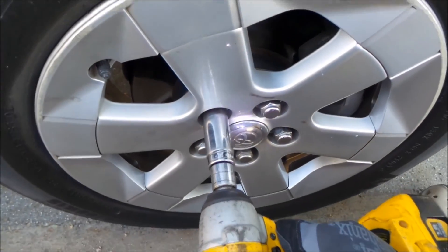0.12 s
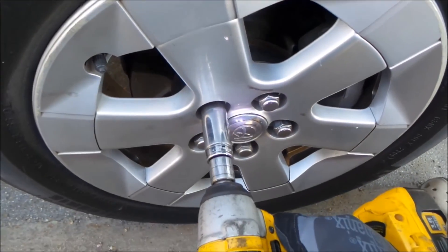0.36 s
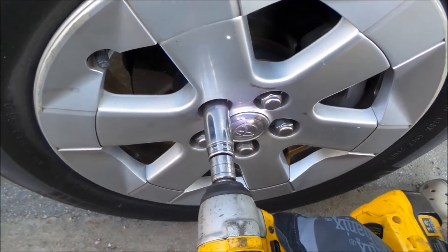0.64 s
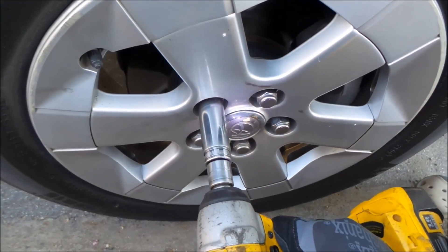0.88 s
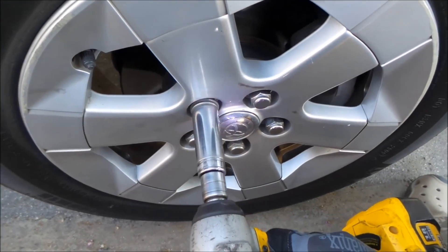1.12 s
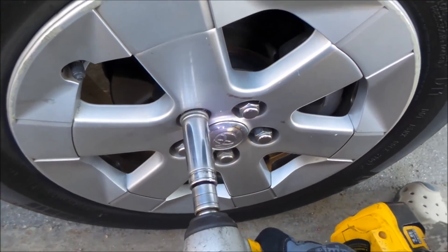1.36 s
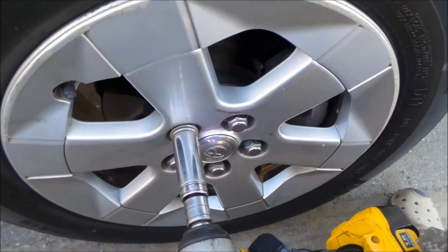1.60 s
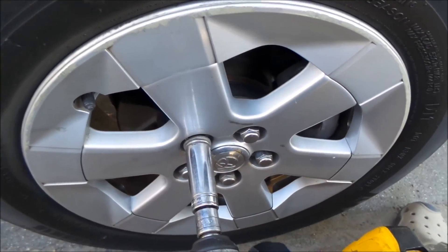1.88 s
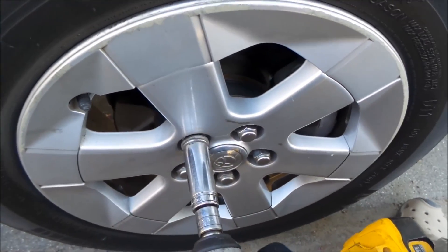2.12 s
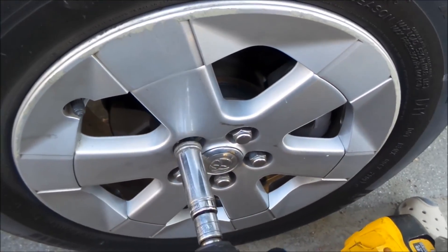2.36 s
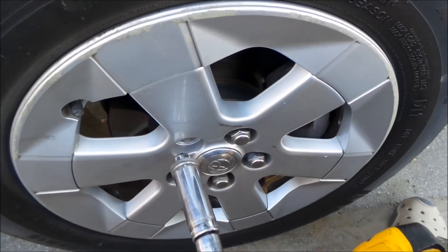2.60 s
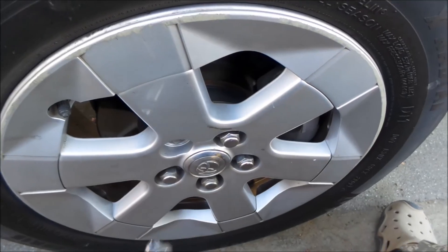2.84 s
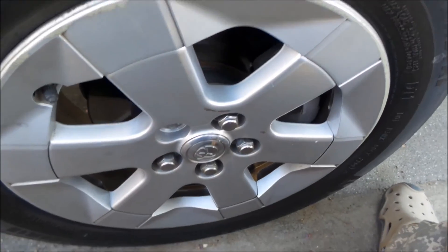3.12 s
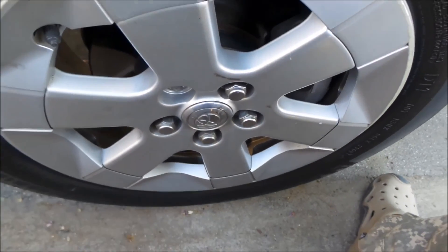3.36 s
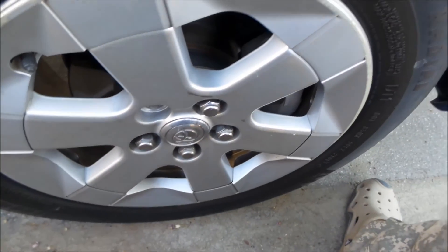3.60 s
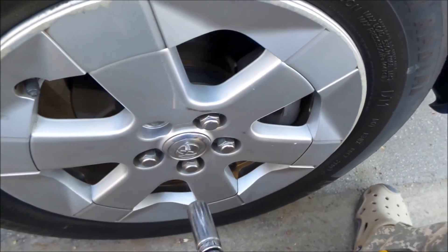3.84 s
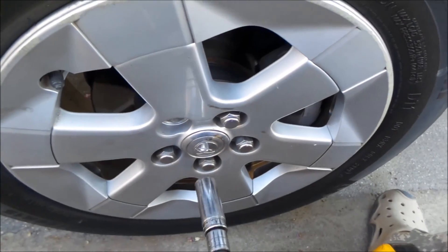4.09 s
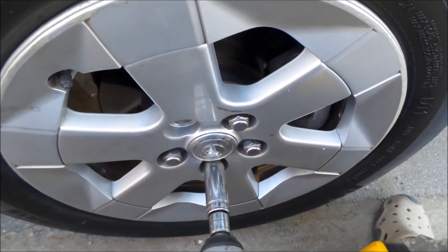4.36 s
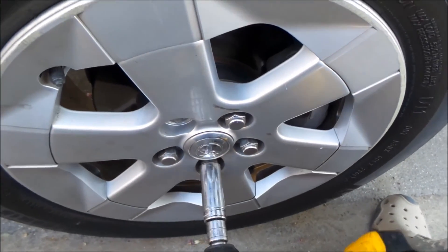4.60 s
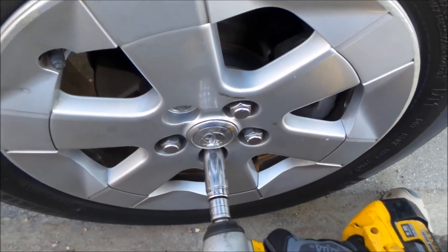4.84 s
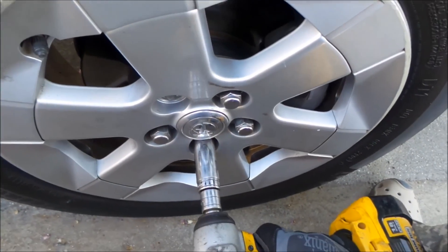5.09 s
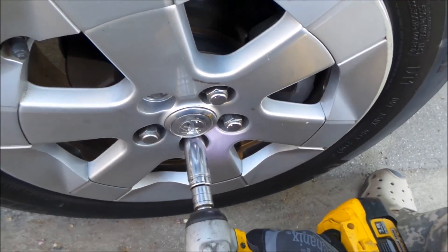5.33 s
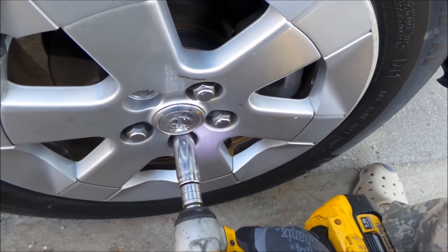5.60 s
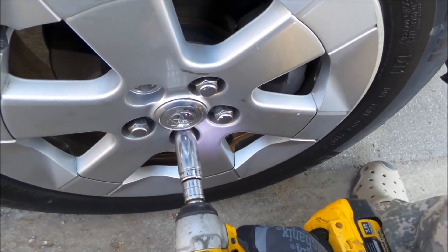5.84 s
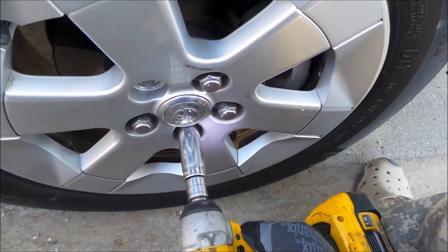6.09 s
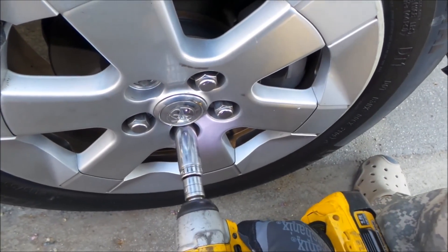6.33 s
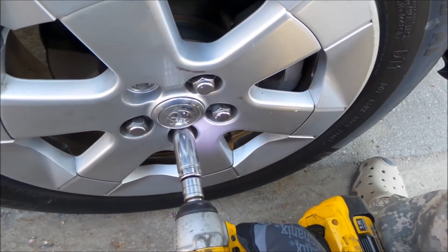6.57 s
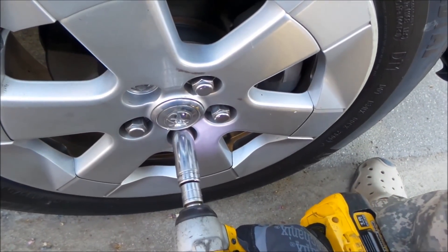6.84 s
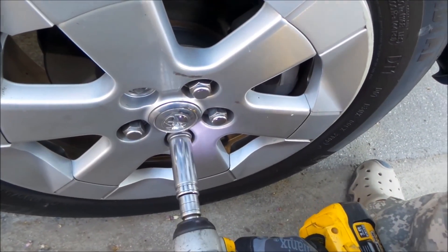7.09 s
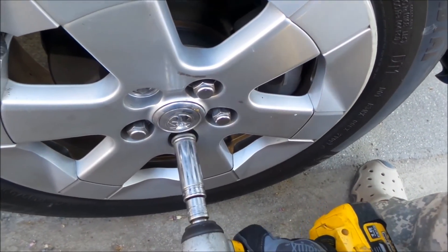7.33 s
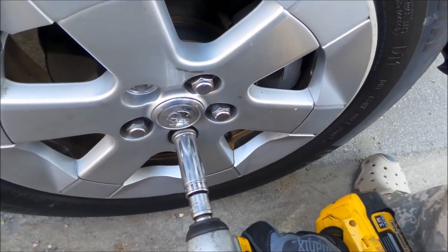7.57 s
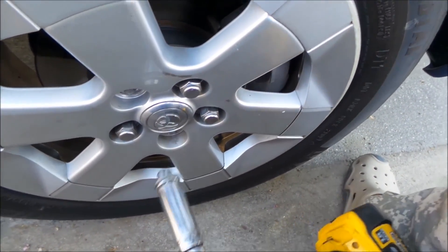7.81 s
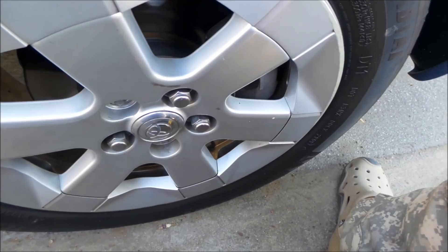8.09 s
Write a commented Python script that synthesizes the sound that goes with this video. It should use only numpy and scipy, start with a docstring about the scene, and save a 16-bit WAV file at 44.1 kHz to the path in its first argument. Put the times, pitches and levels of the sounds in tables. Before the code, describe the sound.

A cordless impact wrench hammers a wheel nut in a harsh rapid rattle, spins free, then the socket clinks onto another nut and hammers again.

```python
"""A cordless impact wrench pounds on a wheel nut about 47 times a second over a distant traffic rumble.
The nut lets go, the motor spins free, coasts and stops, and the loose steel socket rattles and chatters.
After a pause the socket clinks and knocks its way onto a second nut; the wrench pounds and spins again.
The last clinks fade into the street. Blows and motor are shaped noise, ringing modes and gear tones,
socket contacts are noise bursts with decaying sines, and the microphone input overloads on the blows."""
import sys
import numpy as np
from scipy import signal
from scipy.fft import rfft, irfft, next_fast_len
from scipy.io import wavfile
from scipy.ndimage import uniform_filter1d

SR = 44100
rng = np.random.default_rng(int(sys.argv[2]) if len(sys.argv) > 2 else 0)


def bounce(signal):
    """Save signal as a 16-bit WAV file at the path given by the first command-line argument."""
    frames = np.transpose(np.atleast_2d(signal))
    limited = np.clip(frames, -1, 1)
    pcm = np.round(limited * 32767).astype(np.int16)
    wavfile.write(sys.argv[1], SR, pcm)


def voltage_ratio(level):
    """Linear amplitude factor for a level in decibels (scalar or array-like)."""
    return 10 ** (np.asarray(level, float) / 20)


N = 361619

# trigger pulls: pulled_s, nut_free_s, released_s, brake_s, free_mesh_hz (gear mesh pitch once the nut is free)
PULLS = [(-.3, .885, 1.375, 1.845, 1760), (5.214, 6.875, 7.245, 7.37, 1790)]
# hammering, one row a pull: steady_beat_start_s, gap_after_first_blow_s
BURSTS = [(.0108, .021), (5.2918, .031)]


def in_time(rows):
    """Columns of a curve table, one value per sample."""
    s, *columns = np.transpose(rows)
    return [np.interp(np.arange(N) / SR, s, column) for column in columns]


def coloured(x, spectrum):
    """Give white noise a spectrum (Hz, dB); rms 1."""
    hz, db = np.transpose(spectrum)
    size = next_fast_len(N)
    grid = np.maximum(np.arange(size // 2 + 1) * SR / size, 1)
    gain = voltage_ratio(np.interp(np.log(grid), np.log(hz), db))
    y = irfft(rfft(x, size) * gain, size)[:N]
    return y / y.std()


def drift(rate):
    """Slow chance with spread 1, rate knots per second."""
    knots = rng.standard_normal(int(N / SR * rate) + 2)
    return np.interp(np.arange(N) / SR * rate, np.arange(len(knots)), knots) * np.sqrt(3 / 2)


def resonate(x, hz, width):
    """Two-pole resonance, width in Hz; white noise keeps its rms."""
    r = np.exp(-np.pi * width / SR)
    gain = np.sqrt((1 - r * r) / 2)
    return signal.lfilter([gain, 0, -gain], [1, -2 * r * np.cos(2 * np.pi * hz / SR), r * r], x + 1e-18)


def grit(spread_db):
    """Dense clicks of very uneven size."""
    return rng.standard_normal(N) * voltage_ratio(spread_db * rng.standard_normal(N))


def street():
    """Lumpy distant rumble, a smooth hiss whose level follows the same curve and two faint whistles."""
    # background level, sinks after loud sounds and comes back, as with automatic gain: time_s, relative level_db
    background_level = [(.95, -48), (1.35, -52), (1.9, -56), (2.45, -52), (2.85, -43), (3.4, -40),
                        (3.55, -45), (4.0, -49.5), (4.4, -49.5), (4.7, -39.5), (5.18, -37.5), (6.95, -52.5),
                        (7.3, -54.5), (7.6, -55.5), (8.2, -50)]
    # colour of the rumble: pitch_hz, relative level_db (per Hz)
    rumble_colour = [(15, -48), (25, -28), (75, -0.5), (130, 0.5), (242, -6), (284, -10.5), (319, -10.5),
                     (482, -13.5), (1150, -17.5), (2750, -33.5), (6000, -39), (7800, -68), (13200, -120)]
    # colour of the hiss: pitch_hz, relative level_db (per Hz)
    hiss_colour = [(880, -30.5), (1500, 2), (1920, -8.5), (3480, -13.5), (8930, -11), (11600, -11.5),
                   (13600, -9.5), (15600, -23.5)]
    # thin whistles arching in pitch and level: start_s, end_s, pitch_hz, rise_hz, top level_db
    whistle_rows = [(2.75, 2.91, 10300, 1600, -62), (7.15, 7.8, 14400, 10, -67)]
    # hiss at a background level of -41.5 dB; share of that level's changes in dB; floor
    hiss_db, hiss_follows, hiss_least_db = -56.5, 1.5, -73.5
    whistle_edge_db = 18.5   # start and end of a whistle below its top

    background_db, = in_time(background_level)
    rumble_gain = voltage_ratio(background_db + 1.0 + 0.93 * drift(7.4))
    out = rumble_gain * coloured(rng.standard_normal(N), rumble_colour)
    level_db = np.maximum(hiss_db + hiss_follows * (background_db + 41.5), hiss_least_db)
    out += voltage_ratio(level_db + .8 * drift(23)) * coloured(rng.standard_normal(N), hiss_colour)
    t = np.arange(N) / SR
    for start, end, hz, rise_hz, db in whistle_rows:
        arch = 1 - np.abs(2 * (t - start) / (end - start) - 1)
        on = arch > 0
        level_db = db - whistle_edge_db * (1 - arch * on) ** 2 + 3.5 * drift(90)
        pitch_hz = hz + rise_hz * arch * on + 90 * drift(300)
        out += on * voltage_ratio(level_db) * np.sin(2 * np.pi * np.cumsum(pitch_hz) / SR)
    return out


def surroundings(x):
    """Car body, ground and walls scatter back a short dull tail."""
    age = np.arange(SR // 2) / SR
    tail = rng.standard_normal(len(age)) * voltage_ratio(-60 * age / .22) * (age > .004)
    tail = signal.lfilter([.5], [1, -.4], tail)
    return signal.fftconvolve(x, tail / np.sqrt(np.sum(tail ** 2)))[:N]


def motor_state():
    """Mesh pitch, whirr dB and whine dB: run up under load, spin free, coast, then a fast fade at the brake."""
    # motor noise at the loaded speed: relative level_db, one for each pull
    whirr_pull_db = [-28.5, -30.5]
    # gear tones at the loaded speed: relative level_db, one for each pull
    whine_pull_db = [-46.5, -41.5]
    start_hz, loaded_hz, run_up_s, spin_free_s = 350, 1515, .025, 0.12   # gear mesh pitch; time constants
    coast_hz_per_s, brake_db_per_s = 1650, 499.5
    whirr_loaded_db, whirr_follows = 3.5, 1   # extra while hammering; share of the speed change in dB
    whine_loaded_db, whine_coast_db, whine_follows = -7.0, -5, .4

    t = np.arange(N) / SR
    pull_now = np.searchsorted([p[0] for p in PULLS], t) - 1
    pulled, free, released, brake, free_hz = np.transpose(PULLS)[:, pull_now]
    mesh_hz = loaded_hz - (loaded_hz - start_hz) * np.exp(-(t - pulled) / run_up_s)
    free_s = np.clip(t - free, 0, released - free)
    mesh_hz += (free_hz - loaded_hz) * (1 - np.exp(-free_s / spin_free_s))
    mesh_hz = np.maximum(mesh_hz - coast_hz_per_s * np.maximum(t - released, 0), start_hz)
    speed_db = 20 * np.log10(mesh_hz / loaded_hz)
    stop_db = brake_db_per_s * np.maximum(t - brake, 0)
    hammering = np.any([(t > start - gap) & (t < pull[1])
                        for (start, gap), pull in zip(BURSTS, PULLS)], axis=0)
    loaded, coasting = (uniform_filter1d(1. * on, size=SR // 50) for on in (hammering, t > released))
    whirr_db = np.array(whirr_pull_db)[pull_now] + whirr_loaded_db * loaded
    whirr_db += whirr_follows * speed_db - stop_db
    whine_db = np.array(whine_pull_db)[pull_now] + whine_loaded_db * loaded + whine_coast_db * coasting
    whine_db += whine_follows * speed_db - 2.03 * stop_db
    return mesh_hz, np.maximum(whirr_db, -150), np.maximum(whine_db, -150)


def motor():
    """Brush and gear noise, uneven with each turn, under slightly wavering tones; it sets the rim humming."""
    # tones of motor and gears: multiple of the mesh pitch (the first is the motor's turn), relative level_db
    gear_tones = [(.14, -13), (1.0, -2.5), (1.12, -8.5), (1.84, -12.5), (1.944, -1.5), (2.71, -5),
                  (3.0, -9), (3.33, -5.5), (3.75, -4), (4.44, -7)]
    # slow rings of the rim: pitch_hz, width_hz, level_db against the whirr
    rim_modes = [(686, 1.6, -30.5), (5070, 2.7, -29.5), (636, 70, -18)]
    # colour of the motor noise: pitch_hz, relative level_db (per Hz)
    whirr_colour = [(60, -47.5), (150, -26), (400, -17.5), (670, -18), (1140, -12.5), (2000, -7),
                    (3340, -4), (4500, -9), (8000, -8), (12100, -7.5), (15600, -12.5)]

    mesh_hz, whirr_db, whine_db = motor_state()
    turn = 2 * np.pi * np.cumsum(mesh_hz * (1 + .004 * drift(120))) / SR
    tones = sum(voltage_ratio(db + 2.4 * drift(25)) * np.sin(order * turn) for order, db in gear_tones)
    whirr = coloured(grit(3.8), whirr_colour) * voltage_ratio(whirr_db + 1.5 * drift(60))
    whirr *= 1 + 0.18 * np.sin(gear_tones[0][0] * turn)
    shake = rng.standard_normal(N) * voltage_ratio(whirr_db)
    hum = sum(voltage_ratio(db) * resonate(shake, hz, width) for hz, width, db in rim_modes)
    return whirr + hum + voltage_ratio(whine_db + 5.5) * tones


def contacts():
    """All contacts in time order: (s, crack, ring, clank, knock, upper and lower knock modes dB)."""
    # the socket rattles on the tool: time_s, relative ring_db, clank_db
    tool_rattles = [(0.961, -27, -43), (0.9933, -24.5, -33.5), (1.029, -24.5, -36.5), (1.0597, -24, -31.5),
                    (1.3045, -15.5, -26.5), (1.3437, -20, -42.5), (1.3692, -18, -23.5), (1.401, -19, -27),
                    (1.434, -19.5, -24), (1.4629, -21.5, -21), (1.4964, -26.5, -23.5),
                    (1.5058, -18.5, -41.5), (1.5349, -19, -26), (1.5718, -17.5, -42), (1.581, -29, -23.5),
                    (1.6553, -22, -31), (1.6817, -18.5, -28), (1.706, -21.5, -35.5), (1.7604, -18, -31),
                    (1.7954, -34.5, -28.5), (1.8358, -25.5, -22.5), (2.509, -66.5, -61.5),
                    (7.3288, -20.5, -26.5), (7.3365, -16.5, -35), (7.3497, -16, -18)]
    # single broad clinks and clunks, among them the click of the trigger:
    # time_s, relative ring_db, crack_db, body_db
    single_clinks = [(0.917, -27.5, -27, -31), (1.779, -40, -41.5, -30), (1.9476, -60, -57, -52),
                     (2.555, -52, -70, -75), (3.2818, -51.5, -48.5, -54), (3.3191, -53.5, -51.5, -60),
                     (3.341, -38, -36, -40), (3.4765, -1.5, -34.5, -27), (3.4895, -18, -42, -43),
                     (3.5595, -16, -37, -43.5), (3.586, -23.5, -48, -53), (3.617, -30.5, -56, -51),
                     (3.6298, -22.5, -37, -39.5), (3.663, -26, -42.5, -51), (3.684, -33, -40, -46),
                     (3.695, -36, -51.5, -57), (3.7065, -44, -52, -55), (3.734, -34.5, -45.5, -53),
                     (3.7467, -38.5, -47, -57), (3.782, -66.5, -66, -65.5), (5.2038, -35.5, -28.5, -24.5),
                     (6.9023, -33, -30, -34.5), (7.291, -19.5, -24.5, -27.5), (7.45, -58.5, -57, -52.5),
                     (7.5484, -75, -68, -60.5), (7.625, -76, -68, -68), (7.685, -62.5, -74, -66),
                     (7.849, -42, -62, -66), (7.8708, -50, -61, -64), (7.932, -44, -76, -79),
                     (7.975, -75.5, -80, -80), (8.16, -80, -76, -63)]
    # the socket is pushed onto the nut: time_s, relative knock_db, ring_db, upper knock modes_db
    nut_knocks = [(2.5392, -52, -71, -7), (4.3611, -52, -68, -5), (4.436, -27, -38, -0.5),
                  (4.4665, -26.5, -20.5, -2.5), (4.4785, -28, -43.5, 6), (4.494, -43, -57, 5.5),
                  (4.605, -43.5, -63, -12), (4.8459, -33, -43, -15), (4.8653, -35.5, -60.5, -13),
                  (4.882, -32, -59, -16), (4.898, -44, -45.5, -8), (4.9294, -30, -61, -14),
                  (4.9527, -29, -51.5, -15), (4.966, -36, -57, -1), (4.985, -43.5, -60, 3)]
    rattle_crack_db, rattle_knock_db = -13.5, -17.5   # against the ring
    clink_knock_db, clink_modes_db = 1, -8.0   # knock against the body; knock modes against the knock
    knock_crack_db, knock_clank_db, knock_low_db = -16, -17.5, 5   # against the knock; lower modes stand out

    rows = [(s, ring + rattle_crack_db, ring, clank, ring + rattle_knock_db, 0, 0)
            for s, ring, clank in tool_rattles]
    rows += [(s, crack, ring, body, body + clink_knock_db, clink_modes_db, clink_modes_db)
             for s, ring, crack, body in single_clinks]
    rows += [(s, knock + knock_crack_db, ring, knock + knock_clank_db, knock, upper, knock_low_db)
             for s, knock, ring, upper in nut_knocks]
    return sorted(rows)


def socket():
    """Each contact grates for a few ms, knocks the short modes and rings the tube until touch or hand damps it."""
    # short modes of socket and nut: pitch_hz, relative level_db, t60_s
    socket_modes = [(668.7, -2, 0.13), (1300, -6, 0.11), (1410, -2.5, .04), (2320, -10, .05),
                    (2620, -7.5, .16), (3050, -10, .16), (3290, -12.5, 0.17), (3817, -5, 0.057),
                    (5400, -6.5, 0.04), (5420, -1, 0.029), (5710, 0, 0.031), (6200, -11, 0.028),
                    (12180, 1.5, 0.035), (11500, -3, 0.037), (11800, -4.5, 0.047), (13280, -5.5, 0.055),
                    (13600, -8, .025), (13400, -15, 0.022)]
    ring_hz = 11790

    out, length = np.zeros(N + SR), SR // 3
    age = np.arange(length) / SR
    rows = contacts()
    held = motor_state()[1] > -70   # seated on the running tool the tube rings briefly
    hz, db, t60 = np.transpose(socket_modes)[:, :, None]
    luck = rng.standard_normal((len(rows), 2, len(socket_modes), 1))
    white = rng.standard_normal((len(rows), length))
    bands = []   # grating in the knock, clank, crack and ring ranges
    for edges in ([400, 3600], [4600, 6500], [6500, 11000], [11000, 15600]):
        band_pass = signal.butter(4, edges, "band", fs=SR, output="sos")
        bands.append(signal.sosfilt(band_pass, white) / np.sqrt(np.diff(edges) * 2 / SR))
    detune = rng.standard_normal(len(rows))   # the ring pitch varies a little at random between contacts
    following = [row[0] for row in rows[1:]] + [N / SR]
    for k, (s, crack_db, ring_db, clank_db, knock_db, upper_db, lower_db) in enumerate(rows):
        at = round(s * SR)
        levels_db = knock_db + 1.0, clank_db - 1.5, crack_db + 0.5, ring_db - 8.0
        grate = sum(band[k] * voltage_ratio(level_db) for band, level_db in zip(bands, levels_db))
        grate *= voltage_ratio(-age * 1200) + voltage_ratio(-17.5 - age * 500)
        # damped at the next contact, or after 0.12 s
        damping_db = 60 * age / (.08 if held[at] else .6)
        damping_db += 1500 * np.maximum(age - min(following[k] - s, .12), 0)
        tube_db = ring_db - (8.0 if held[at] else 3.5) - damping_db
        ring = voltage_ratio(tube_db) * np.sin(2 * np.pi * ring_hz * (1 + 0.004 * detune[k]) * age)
        treble_db = ring_db + (1.5 if held[at] else -6.5)
        level_db = db + np.select([hz > 9000, hz > 4500, hz > 2000],
                                  [treble_db, clank_db + 3.5, knock_db + upper_db],
                                  knock_db + lower_db - 7.5)
        mode_gain = voltage_ratio(level_db + 4.8 * luck[k, 0] - 60 * age / t60)
        modes = mode_gain * np.sin(2 * np.pi * hz * (1 + 0.0066 * luck[k, 1]) * age)
        out[at:at + length] += (grate + ring + modes.sum(axis=0)) * np.minimum(age / .0006, 1)
    return out[:N]


def chatter_levels():
    """High and low tone dB: each spell sets in at once, fades or swells at its own rate and dies quickly."""
    # spells of chatter: start_s, end_s, relative high_tone_db, low_tone_db, fade_db_per_s (negative swells)
    spells = [(1.308, 1.602, -34.5, -38, -11), (1.652, 1.857, -30.5, -32.5, 36.5),
              (3.484, 3.552, -23, -64, 168), (3.557, 3.593, -18.5, -56, 30.),
              (3.617, 3.633, -28, -57, -400.), (3.631, 3.753, -34.5, -56, 89)]
    edge_db_per_s = 897   # fall after the end of a spell

    t = np.arange(N) / SR
    start, end, high_db, low_db, fade = np.transpose(spells)[:, :, None]
    shape_db = -fade * np.clip(t - start, 0, end - start) - edge_db_per_s * np.maximum(t - end, 0)
    shape_db[t < start] = -np.inf
    return [np.maximum((db + shape_db).max(axis=0), -150) for db in (high_db, low_db)]


def chatter():
    """Between clear contacts the loose socket keeps touching many times over and sings its two tube tones."""
    high_db, low_db = chatter_levels()
    touches = (rng.random(N) < 3000 / SR) * grit(2.0) * np.sqrt(SR / 3000) * voltage_ratio(1.5 * drift(70))
    # only the treble of a touch reaches the high tone
    upper = resonate(touches * voltage_ratio(high_db - 13), 12200, 1800)
    high = voltage_ratio(6.0) * resonate(upper, 11860, 55) + voltage_ratio(-11.5) * resonate(upper, 12300, 900)
    low = resonate(resonate(touches * voltage_ratio(low_db - 12.5), 5660, 600), 5660, 130)
    return high + low


def blow_times():
    """A first blow with its own gap, then a limping beat that runs until the nut is free."""
    # beat of the hammer: time_s, blows_per_s, limp_ms (alternate blows shift later and earlier by this)
    beat_curve = [(0, 46.468, .4), (.25, 47.324, .5), (.31, 47.219, -.6), (.45, 46.974, -.6),
                  (.65, 47.535, 0), (.88, 49.2, 0), (5.29, 47.552, -.4), (5.34, 47.115, .9),
                  (5.45, 46.153, .9), (5.65, 46.062, .9), (5.7, 46.039, -.8), (5.8, 45.994, -.7),
                  (6.1, 46.088, -.3), (6.4, 45.763, -.2), (6.55, 46.39, 0), (6.87, 48.449, 0)]
    jitter_s = .0002

    s, rate, limp_ms = np.transpose(beat_curve)
    times = []
    for (start, first_gap), pull in zip(BURSTS, PULLS):
        t = np.arange(start, pull[1], 1 / SR)
        beats = np.cumsum(np.interp(t, s, rate)) / SR
        count = np.arange(int(beats[-1]) + 1)
        at = np.interp(count, beats, t)
        limp_s = (-1.) ** count * np.interp(at, s, limp_ms) / 1000
        at = at + limp_s + jitter_s * rng.standard_normal(len(at))
        times += [start - first_gap, *at]
    return np.array(times)


def hammer():
    """After each blow the loose parts rebound for some ms, then settle; each blow shakes other modes."""
    # strength of the blows: time_s, relative rattle_db, typical rebound_s
    blow_strength = [(0, -5, 0.0083), (.5, -7, 0.007), (.88, -7.5, 0.003), (5.26, -3.5, 0.0083),
                     (5.4, -7.5, 0.011), (6.0, -8, 0.0097), (6.5, -6, 0.008), (6.7, -6.5, 0.0051),
                     (6.87, -11, 0.0045)]
    # low pops of the overloaded input during some blows, a millisecond or two long:
    # time_s, signed height before the high-pass
    overload_pops = [(0.0203, 0.28), (0.183, 0.17), (0.3543, -0.16), (0.5227, 0.2), (0.6072, 0.43),
                     (0.8351, 0.12), (5.317, 0.2), (5.5543, 0.14), (5.986, -0.15), (6.0518, 0.35),
                     (6.2242, 0.15), (6.3568, 0.35), (6.4448, -0.16), (6.5722, 0.31)]
    # what wheel, socket and anvil ring with: pitch_hz, width_hz, relative level_db
    wheel_modes = [(2996, 88, -10.5), (3380, 90, -3), (3780, 110, -3.5), (4610, 70, -9), (5150, 45, -10.5),
                   (5460, 45, -8), (5860, 56, -5.5), (6234, 110, 1.5), (6720, 70, -5), (7270, 80, -3),
                   (8590, 110, -2.5), (9175, 99, 1), (9920, 79, 2.5), (11660, 370, 6), (13850, 200, 3.5)]
    # colour of the rattling parts: pitch_hz, relative level_db (per Hz)
    rattle_colour = [(59, -42.5), (100, -9), (468, -12), (684, -3), (810, -13.5), (1700, -9), (3270, -6.5),
                     (4990, -3.5), (6030, -5.5), (7940, -4.5), (11900, 0.5), (14300, -2), (15600, -11)]
    # end of a rebound: a quick drop, then a softer after-rattle
    drop_db_per_s, after_db, after_db_per_s = 2000, -4.5, 850

    s, t = blow_times(), np.arange(N) / SR
    last = np.searchsorted(s, t, "right") - 1
    age = t - s[last]
    luck = rng.standard_normal((len(s), len(wheel_modes) + 2))
    strength_db, rebound_s = in_time(blow_strength)
    rebound_s = rebound_s * voltage_ratio(0.9 * luck[last, -1])
    after = np.maximum(age - rebound_s, 0)
    fall = np.maximum(voltage_ratio(-drop_db_per_s * after), voltage_ratio(after_db - after_db_per_s * after))
    envelope = voltage_ratio(strength_db + 0.5 * luck[last, -2]) * fall * np.minimum(age / 0.0005, 1)
    out = coloured(grit(3.1), rattle_colour) * envelope
    # the strike itself is short and deeper; the two hammer jaws strike unequally
    jaw_db = 7.8 * (-1.) ** last
    strike = voltage_ratio(strength_db - 14.0 + jaw_db + 2.0 * luck[last, 0] - 2500 * age)
    strike_band = signal.butter(2, [500, 5000], "band", fs=SR, output="sos")
    out += signal.sosfilt(strike_band, grit(3.0) * strike) * 2
    shake = rng.standard_normal(N) * envelope
    for k, (hz, width, db) in enumerate(wheel_modes):
        out += resonate(shake * voltage_ratio(2.3 * luck[last, k]), hz, width) * voltage_ratio(db - 13.5)
    pop = np.zeros(N)
    pop[[round(at * SR) for at, height in overload_pops]] = [height for at, height in overload_pops]
    bump = np.exp(-(np.arange(-200, 201) / SR / 0.00083) ** 2)
    pop = signal.fftconvolve(pop, bump, "same")
    return out + signal.sosfilt(signal.butter(2, 70, "high", fs=SR, output="sos"), pop)


def scene():
    """The tool close to a single microphone, the same in both channels."""
    tool = hammer() + motor() + socket() + chatter()
    return np.tile(tool + voltage_ratio(-19) * surroundings(tool) + street(), (2, 1))


def top_cut(x):
    """Nothing passes above the cut-off."""
    return signal.sosfilt(signal.butter(12, 15760, fs=SR, output="sos"), x)


def record(dry):
    """The microphone input overloads softly on the blows."""
    mix = 1.089 * np.tanh(dry / 0.99)
    return top_cut(mix)


dry = scene()
out = record(dry)
bounce(out)
```